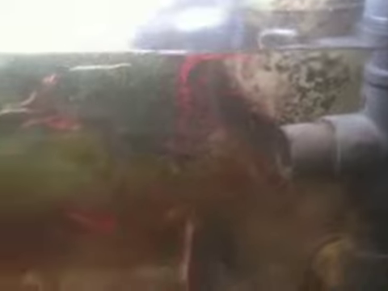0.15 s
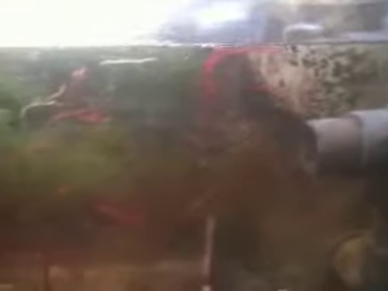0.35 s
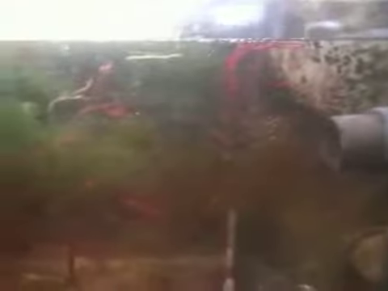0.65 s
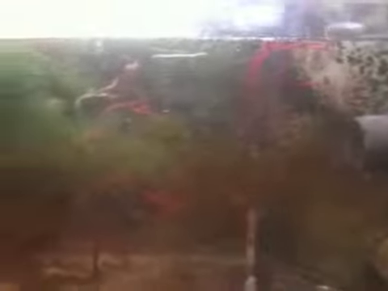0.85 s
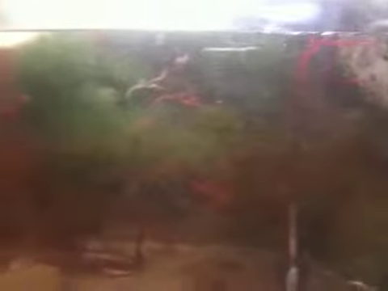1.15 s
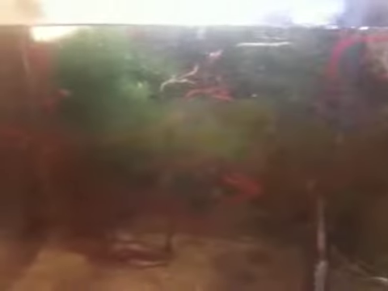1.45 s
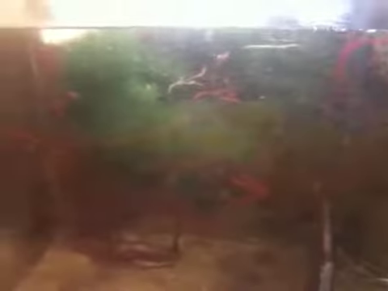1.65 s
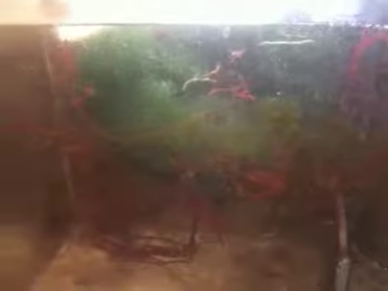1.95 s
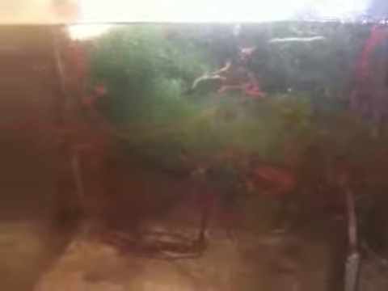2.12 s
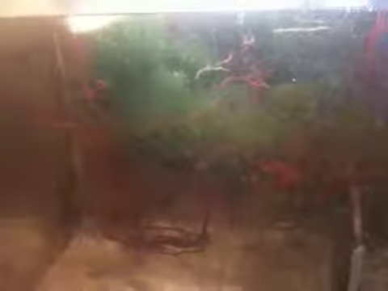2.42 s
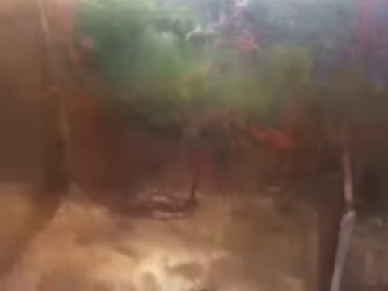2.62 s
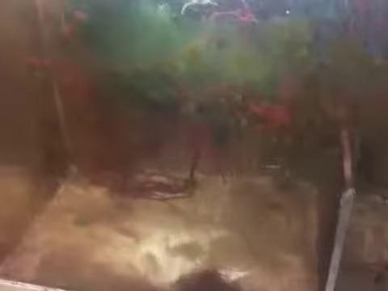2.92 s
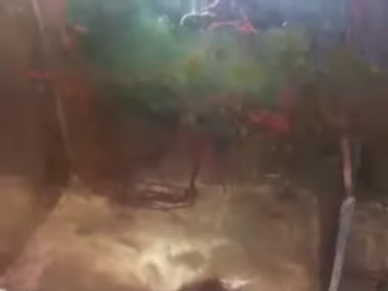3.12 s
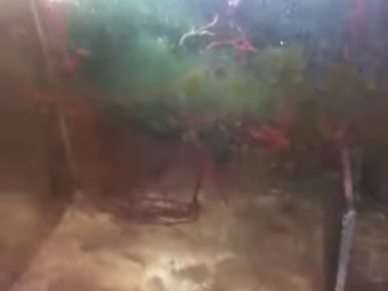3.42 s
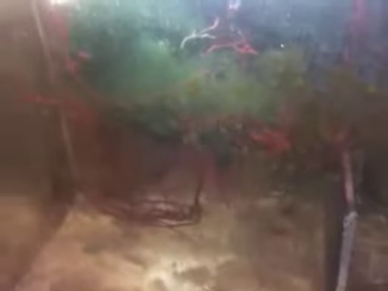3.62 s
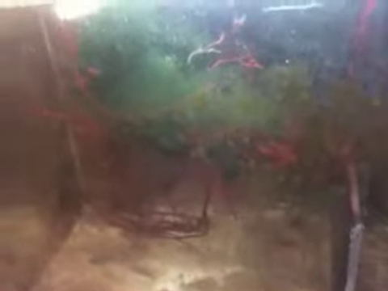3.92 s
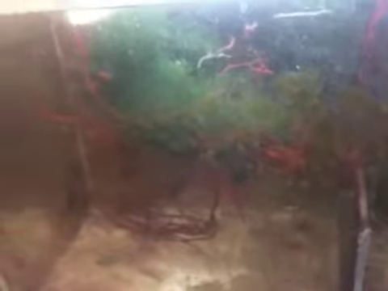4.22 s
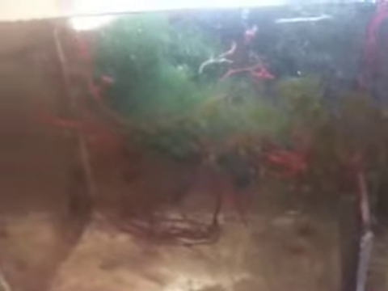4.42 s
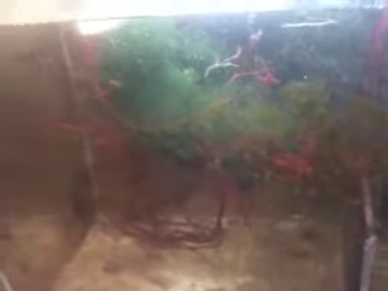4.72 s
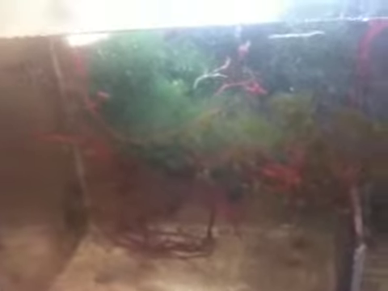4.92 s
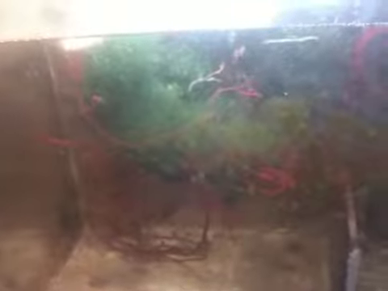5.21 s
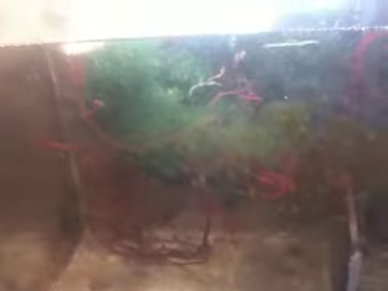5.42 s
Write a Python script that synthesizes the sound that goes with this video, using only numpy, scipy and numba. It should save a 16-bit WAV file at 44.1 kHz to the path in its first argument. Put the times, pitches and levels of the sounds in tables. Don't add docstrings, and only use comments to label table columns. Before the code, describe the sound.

Water trickles and bubbles through plastic pipes under an aquarium while a low mains hum drones continuously behind it.

```python
import sys
import numpy as np
from scipy import signal
from scipy.fft import rfft, irfft
from scipy.io import wavfile
from scipy.ndimage import uniform_filter1d
from numba import njit

SR = 44100
rng = np.random.default_rng(int(sys.argv[2]) if len(sys.argv) > 2 else 0)


def dump_mix(stems):
    frames = np.atleast_2d(stems).T
    limited = np.clip(frames, -1, 1)
    pcm = np.round(limited * 32767).astype(np.int16)
    wavfile.write(sys.argv[1], SR, pcm)


def elevation(decibels):
    levels = np.asarray(decibels, float)
    return 10 ** (levels / 20)


N = 244736

# mains_multiple, level_db
HUM_LINES = [(2, -52), (3, -39.5), (4, -65.5), (5, -60), (6, -70), (8, -59), (9, -72), (10, -73),
             (11, -85.5), (12, -72), (15, -71.5), (17, -76.5), (18, -70.5)]
# start_s, level_db
MOTOR_LOAD = [
    (0.0, -39),
    (0.06, -40.5),
    (0.71, -41),
    (0.8, -40.5),
    (2.98, -40),
    (5.5, -40.5),
    (5.55, -41.5),
]
# frequency_hz, level_db (per Hz)
RUMBLE_SHAPE = [(25, -34.5), (70, -32.5), (100, -19), (135, -4.5), (205, -1), (225, -14.5), (260, -8),
                (352, -15), (450, -8), (700, -13), (900, -27), (1300, -38)]
# frequency_hz, width_hz, lift_db
CABINET_MODES = [(185, 13, 4), (279, 23, 6), (306.3, 19, 6), (327, 15, 9), (271.4, 16.4, 3), (415, 24, 5),
                 (520, 20, -0.5), (592.6, 19, 4.5)]
# start_s, swell_db (negative chokes)
COLUMN_SLOSHES = [(.15, 8.5), (.6, 5), (.73, 5.5), (.82, 1), (.94, 2), (1.03, -4), (1.1, 6), (1.58, 4),
                  (1.68, -7), (1.82, -4), (1.96, 0), (2.06, 4), (2.18, -18), (2.3, 1), (2.4, 13.5),
                  (2.64, 3), (3.37, 5), (3.62, 0), (3.76, -12), (3.82, 8.5), (4.02, 5.5), (4.14, -8),
                  (4.65, 3), (4.73, -4), (4.9, 2), (4.95, -6), (5.19, 8), (5.3, -10)]
# start_s, place (0 outlet - 1 middle)
MIC_PLACE = [
    (0, 0.16),
    (.9, 0.41),
    (1.7, 0.96),
    (5.55, 0.96),
]
# frequency_hz, width_hz, outlet_lift_db, middle_lift_db
PIPE_MODES = [(1017, 147, 5, 15), (1178, 27, 1, 6), (1353, 120, 3, 6), (1505, 51, 3, 8.5),
              (1558, 37, -11, 14.5), (1635, 33, 13, 8), (1927, 92, -3.5, 6.5), (2225, 43, 4, 12.5),
              (2387, 34, 1, 11.5), (2590, 78, 6, 4.5), (2760, 42, 3.5, 5), (2783, 220, 2, 5),
              (3030, 29, 7, 10), (3260, 25, 9.5, 12.5), (3790, 88, -12, 12.5), (4360, 56, 8.5, 10),
              (4780, 28, 4, 16), (5040, 130, 5, 6), (5480, 36, 14, 12), (6020, 85, 10, 6), (6600, 73, 5, 6),
              (7100, 550, 6.5, 4)]
# frequency_hz, level_db (per Hz)
WATER_SHAPE = [(400, -27.5), (700, -12.5), (850, -13.5), (1240, -11), (1440, -13), (1760, -13.5),
               (2100, -15.5), (3500, -19), (5500, -21), (7200, -17), (8600, -21.5), (10000, -21.5),
               (11000, -50), (15700, -46)]
# start_s, stream_level_db, spray_lift_db
WATER_FLOW = [
    (0, -53.5, -13.5),
    (.8, -54.5, -9),
    (1.6, -57.5, -3),
    (2.4, -57.5, -1.5),
    (3.2, -58.5, -5.5),
    (4, -57.5, -2.5),
    (4.8, -57.5, -5),
    (5.55, -57.5, -3.5),
]
# start_s, level_db, pitch_hz, spread_octaves
WIDE_GURGLES = [(0.209, -51, 1620, 0.37), (0.637, -50, 1340, 0.72), (0.667, -47.5, 1600, 0.063),
                (0.831, -47.5, 1585, .19), (1.041, -46.5, 1450, 0.41), (1.139, -49.5, 1400, .21),
                (1.176, -50, 1750, 0.42), (1.542, -49, 1350, 0.84), (1.684, -46, 1530, 0.47),
                (2.462, -53, 1460, 0.36), (2.524, -55, 1440, 0.34), (2.678, -48, 1300, 0.56),
                (2.822, -52.5, 1590, 0.32), (2.896, -52, 1550, 0.23), (3.131, -49, 1543, 0.078),
                (3.184, -51.5, 1490, 0.19), (3.743, -51, 1530, 0.2), (3.777, -51, 1604, 0.11),
                (4.395, -60, 1570, 0.22), (4.705, -53.5, 1710, 0.71), (5.206, -48, 1900, 0.77)]
# start_s, level_db, pitch_hz
WIDE_BLIPS = [(0.5337, -41.5, 1510), (1.4301, -49, 1570), (1.6287, -54, 1560), (2.0273, -53, 1480),
              (2.277, -52, 1520), (2.4049, -52, 1510), (2.4892, -47, 1510), (2.9282, -52, 1360),
              (2.9946, -51, 1580), (3.2201, -51, 1550), (3.2615, -58, 1430), (3.3544, -52, 1500),
              (3.6491, -51, 1530), (3.686, -50, 1320), (3.8207, -51, 1570), (3.8506, -49, 1490),
              (3.8926, -51, 1530), (4.0193, -50, 1520), (4.1664, -48, 1520), (4.3136, -56, 1570),
              (4.362, -52, 1570), (4.4583, -52, 1420), (4.589, -52, 1400), (4.9576, -51, 1490),
              (5.0968, -55, 1480), (5.1317, -54, 1500), (5.2395, -50, 1560), (5.3612, -52, 1570),
              (5.453, -53, 1510), (5.5293, -56, 1600)]
# start_s, level_db, pitch_hz
NARROW_TRICKLES = [(0.397, -55.5, 2880), (0.535, -55.5, 2640), (0.824, -54, 3130), (1.051, -55.5, 3320),
                   (1.22, -57.5, 2900), (1.292, -60, 3100), (2.128, -59, 2860), (2.167, -57, 3200),
                   (2.354, -59, 2760), (2.705, -63, 2440), (3.437, -58.5, 2550), (3.548, -58, 2260),
                   (4.51, -61, 2920), (4.92, -59, 3200), (4.966, -56, 2200), (5.048, -56, 3000),
                   (5.39, -55, 2900)]
# start_s, level_db, pitch_hz
NARROW_BEADS = [(0.3451, -55, 2540), (0.442, -58, 2790), (0.4958, -51, 2520), (0.5696, -54, 2600),
                (0.6458, -55, 2660), (1.1378, -54, 2700), (1.3518, -54, 2680), (1.4064, -55, 2800),
                (1.516, -51, 2720), (1.5816, -50, 2760), (1.6856, -62, 2600), (1.7173, -53.5, 2670),
                (1.8806, -61, 2760), (2.0842, -53.5, 2760), (2.582, -57, 2780), (2.6397, -55, 2760),
                (2.967, -59, 2460), (3.2645, -56, 3270), (3.4057, -61, 2400), (3.6431, -54, 2690),
                (3.9, -58, 2700), (4.159, -56, 2900), (4.3161, -60, 2730), (4.7057, -58, 2360),
                (5.2031, -55, 2480), (5.244, -54, 2520)]
# start_s, level_db, pitch_hz
AIR_GLUGS = [(0.501, -47, 1070), (0.545, -42, 1160), (0.635, -45, 1090), (0.69, -50, 1020),
             (0.817, -48, 1050), (1.158, -54, 977), (1.189, -50, 1030), (1.271, -53, 1070),
             (1.68, -45, 1180), (1.756, -48, 910), (1.846, -55, 970), (2.025, -49, 1050), (2.155, -54, 972),
             (2.206, -55, 1070), (2.314, -53, 1090), (2.432, -51, 991), (2.684, -49, 1070),
             (2.723, -45, 1030), (2.798, -52, 1050), (2.857, -49, 1030), (2.901, -46.5, 1060),
             (3.033, -53, 1060), (3.228, -50, 960), (3.306, -49, 1180), (3.421, -53, 1090),
             (3.672, -49, 1020), (3.712, -52, 1060), (3.778, -48, 1040), (3.985, -60, 1030),
             (4.081, -51, 1050), (4.189, -51, 1010), (4.389, -50, 1020), (4.447, -47.5, 1010),
             (4.652, -54, 1080), (4.746, -51, 1030), (5.006, -49, 966), (5.053, -53, 1060),
             (5.139, -54, 1040), (5.452, -47, 1070), (5.484, -54, 1000)]
# start_s, level_db, pitch_hz
RIM_PLINKS = [(0.1251, -53.5, 4250), (0.2942, -49, 4270), (0.401, -52.5, 5050), (0.5745, -47, 5100),
              (0.824, -59, 5640), (1.0793, -55, 4360), (1.2745, -63, 3800), (1.322, -50, 4270),
              (1.4475, -51, 6110), (1.5768, -55, 4870), (1.6516, -54, 4830), (1.7345, -60, 5000),
              (2.0465, -53.5, 4890), (2.2174, -56, 4560), (2.6, -53, 3870), (2.7072, -62, 3780),
              (3.105, -52, 4830), (3.1657, -56, 6160), (3.2251, -58, 5040), (3.4216, -54, 6090),
              (3.678, -58, 3790), (3.8217, -57, 4870), (3.8985, -51, 6030), (3.9589, -58, 3790),
              (3.9977, -54, 4250), (4.2757, -58, 5900), (4.3625, -56, 3600), (4.4735, -52, 3990),
              (4.5385, -53, 4860), (4.6054, -54, 3840), (4.7167, -57, 4400), (4.8319, -57, 6140),
              (4.8853, -49.5, 5130), (4.9616, -56, 3690), (5.0384, -59, 3980), (5.1302, -61, 3790),
              (5.238, -56.5, 6130), (5.3014, -60, 4400)]
# start_s, level_db, pitch_hz, spread_octaves
SUMP_SPLASHES = [(0.245, -64, 8800, .3), (0.576, -52.5, 7800, 1.05), (0.802, -66, 7500, .27),
                 (0.827, -65, 9340, 1.18), (0.874, -62.5, 6600, .71), (1.08, -58, 9900, 0.74),
                 (1.156, -62.5, 8940, 1), (1.191, -64, 7520, .42), (1.228, -63, 9200, .22),
                 (1.334, -61, 9800, 0.7), (1.45, -58, 7400, 0.48), (1.577, -56.5, 7100, 1.3),
                 (1.731, -61, 10630, 0.96), (2.062, -58, 7900, 0.72), (2.345, -57.5, 10500, 1.4),
                 (2.676, -62, 9500, .3), (2.895, -61, 7200, .28), (3.023, -61.5, 11100, 0.98),
                 (3.169, -61, 9700, 0.48), (3.424, -60, 6700, 0.57), (3.831, -62, 11600, 0.7),
                 (3.9, -57, 7160, .91), (4.02, -64, 11100, .73), (4.112, -62, 7200, 0.42),
                 (4.218, -59, 11000, 1.1), (4.424, -60.5, 7000, 0.61), (4.539, -58.5, 7520, 1.1),
                 (4.889, -59.5, 11100, 0.78), (5.131, -57, 9350, .3), (5.314, -67, 11100, .83)]
# start_s, level_db, pitch_hz
FINE_SPITS = [(0.1156, -61, 14200), (0.4025, -62, 14100), (0.5736, -47, 12500), (0.822, -61, 11000),
              (1.0789, -55, 14200), (1.2531, -58, 12000), (1.3319, -59, 15400), (1.4506, -57, 13700),
              (1.5294, -55, 14400), (1.5743, -58, 11000), (1.73, -59, 12800), (1.7699, -56, 13300),
              (2.3416, -53, 12900), (2.4498, -61, 12000), (2.584, -55, 14700), (2.7043, -62, 15400),
              (2.7916, -60, 14300), (2.8634, -55, 14300), (2.9093, -57, 13600), (3.0225, -59, 13700),
              (3.1622, -61, 12100), (3.5483, -61, 13400), (3.8172, -57, 12800), (3.902, -56, 11100),
              (4.0183, -58, 14200), (4.2043, -57, 14100), (4.365, -60, 14100), (4.5067, -55, 11000),
              (4.54, -58, 11100), (4.5815, -59, 12700), (4.6174, -50, 15400), (4.8404, -64, 13600),
              (4.8898, -58, 12900), (5.1302, -59, 11300), (5.3622, -60, 13200), (5.452, -52, 15200)]


def level(x, db):
    return x * elevation(db) / np.sqrt(np.mean(x ** 2))


def curve(table):
    s, *columns = np.transpose(table)
    return [np.interp(np.arange(N) / SR, s, c) for c in columns]


def walk(rate_hz):
    k = int(SR / rate_hz)
    held = np.repeat(rng.standard_normal(N // k + 1), k)
    return 0.89 * uniform_filter1d(uniform_filter1d(held, k), k)[:N]


def colour(x, shape, modes, size=16384):
    hz = np.arange(size // 2 + 1) * SR / size + 1
    shape_hz, shape_db = np.transpose(shape)
    db = np.interp(np.log(hz), np.log(shape_hz), shape_db)
    db = db + sum(lift / (1 + (2 * (hz - f) / w) ** 2) for f, w, lift in modes)
    cep = irfft(np.log(elevation(db)))
    cep[1:size // 2] *= 2
    cep[size // 2 + 1:] = 0
    return signal.fftconvolve(x, irfft(np.exp(rfft(cep))))[:N]


@njit
def bubbles(start, hz, cycles, size, glide, length):
    out = np.zeros(length)
    for k in range(len(start)):
        n = int(cycles[k] * SR / hz[k]) + 2
        fade, up = np.exp(-np.log(1000) / n), (1 + glide) ** (1 / n)
        a, w, phase, shut = size[k], 2 * np.pi * hz[k] / SR, 0., 1.
        for i in range(start[k], min(start[k] + n, length)):
            out[i] += a * (1 - shut) * np.sin(phase)
            phase += w
            w = min(w * up, 3.)
            a *= fade
            shut *= fade ** 4
    return out


def slosh():
    t, bump_s = np.arange(N) / SR, 0.016
    return sum(db * np.exp(-.5 * ((t - s) / bump_s) ** 2) for s, db in COLUMN_SLOSHES)


def pump():
    mains_hz, jolt_s = 60.024, .0016
    load_db, = curve(MOTOR_LOAD)
    turn = 2 * np.pi * mains_hz * (np.arange(N) / SR - jolt_s)
    lines = 0
    for k, db in HUM_LINES:
        phase = (k > 6) * rng.uniform(0, 2 * np.pi)
        waver_db = (.4 + .6 * (k > 9)) * walk(7.5)
        lines = lines + elevation(db + waver_db) * np.sqrt(2) * np.cos(k * turn + phase)
    rough = rng.standard_normal(N) * elevation(.5 * walk(20))
    rumble = level(colour(rough, RUMBLE_SHAPE, CABINET_MODES), -52)
    near_column = signal.butter(2, (250, 340), "band", fs=SR, output="sos")
    band = signal.sosfiltfilt(near_column, lines + rumble)
    return lines * elevation(load_db - load_db.mean()) + rumble + band * (elevation(slosh()) - 1)


def pipes(x, shape, share):
    place, = curve(MIC_PLACE)
    f, w, outlet_db, middle_db = np.transpose(PIPE_MODES)
    cap_db = np.where(f > 2000, 8, 12)
    w = np.maximum(w, f / 100)
    outlet = colour(x, shape, zip(f, w, share * np.minimum(outlet_db, cap_db)))
    middle = colour(x, shape, zip(f, w, share * np.minimum(middle_db, cap_db)))
    return outlet + np.clip(place, 0, 1) * (middle - outlet)


def sump(x):
    trips_ms, back = np.array([1.3, 2.9, 4.7, 7.9]), 0.5
    turn = -2j * np.pi * np.arange(N // 2 + 1) * SR / N
    trips = np.exp(turn * trips_ms[:, None] / 1000)
    return irfft(rfft(x, N) * np.prod((trips - back) / (1 - back * trips), axis=0), N)[:N]


def mist():
    t, fade_s = np.arange(N) / SR, 0.1
    lull = sum((t > s) * np.exp(-np.abs(t - s) / fade_s) for s, *_ in SUMP_SPLASHES)
    return -2 * np.minimum(lull, 1) + 4 * walk(19.0)


def swarm(lo_hz, cycles, scatter_db, per_hz):
    when, pitch, loud = rng.random((int(per_hz * lo_hz), 3)).T
    hz = lo_hz * (1 + (np.sqrt(2) - 1) * pitch)
    extra_db = np.minimum(-scatter_db * np.log(1 - loud), 9)
    size = np.sqrt(hz) * elevation(extra_db)
    x = bubbles((when * N).astype(np.int64), hz, cycles + 0 * hz, size, 0.087, N)
    return level(x, 10 * np.log10(lo_hz))


def stream():
    flow_db, spray_db = curve(WATER_FLOW)
    mist_db = mist()
    spit, mix = walk(23.88), 0
    for hz in 350 * 2 ** np.arange(0, 5.6, .5):
        fine = np.clip(np.log2(hz / 2500) / 2, 0, 1)
        surge_db = .9 * spit + 1.16 * walk(25.97) + 0.36 * walk(7.9)
        surge_db = surge_db + fine * (1.9 * spit + spray_db) + fine ** 3 * mist_db
        mix = mix + swarm(hz, 21.2 + 45 * fine, 2.0 + 3.4 * fine, 3. - 1.8 * fine) * elevation(surge_db)
    return level(pipes(mix, WATER_SHAPE, 1), 0) * elevation(flow_db)


def rows(table, *shared):
    return np.c_[table, np.tile(shared, (len(table), 1))]


def bursts(table, ring, trim_db, count):
    s, db, hz, spread, ms = (c[:, None] for c in np.transpose(table))
    late, off = np.moveaxis(rng.random((len(table), count, 2)), -1, 0)
    swell_s = 7 / hz
    start = (SR * (s - swell_s + 1.3 * ms / 1000 * late ** 2.1)).astype(np.int64)
    pitch = np.minimum(hz * 2 ** (spread * (off - .5)), .4 * SR)
    cycles = ring / spread + 0 * off
    ring_s = cycles / pitch / (4 * np.log(1000))
    size = elevation(db + trim_db) * np.sqrt((ms / 1000 + 0.0036) / (count * ring_s))
    return bubbles(start.ravel(), pitch.ravel(), cycles.ravel(), size.ravel(), 0.028, N)


def spatter(level_db, scatter_db, low_hz, octaves, wide_oct, count):
    when, loud, pitch, spread, span = rng.random((count, 5)).T
    db = level_db + np.minimum(-scatter_db * np.log(1 - loud), 6)
    return np.c_[when * N / SR, db, low_hz * 2 ** (octaves * pitch), .25 + wide_oct * spread, 5 + 14 * span]


def drain_bubbles():
    wide = bursts(rows(WIDE_GURGLES, 9), 9.5, -8.0, count=14)
    wide = wide + bursts(rows(WIDE_BLIPS, 0.13, 12), 4.4, -14.0, count=8)
    narrow = bursts(rows(NARROW_TRICKLES, 0.35, 11), 6.3, -3.0, count=12)
    narrow = narrow + bursts(rows(NARROW_BEADS, 0.24, 16), 7.5, -12.0, count=12)
    standpipe = bursts(rows(AIR_GLUGS, .2, 16), 3.6, -16.5, count=8)
    return wide + narrow + standpipe


def droplets():
    rim = bursts(rows(RIM_PLINKS, 0.31, 12), 5.9, -9.5, count=24)
    splashes = bursts(rows(SUMP_SPLASHES, 11), 13.4, 0.25, count=110)
    finest = bursts(rows(FINE_SPITS, 0.64, 16), 9.3, -10.5, count=60)
    high = bursts(spatter(-71, 2.7, 6050, 1.33, 0.85, count=120), 3.1, 0, count=30)
    low = bursts(spatter(-70, 1.4, 2300, 1.37, 0.19, count=110), 6.9, 0, count=10)
    return rim + splashes + finest + high + low


def scene():
    drops = pipes(drain_bubbles() + droplets(), [(60, -30), (510, 0), (16000, 0)], 0.96)
    water = sump(stream() + elevation(-12) * drops)
    return (pump() + drops + water)[None]


def low_pass(x):
    return signal.sosfilt(signal.butter(12, 16600, fs=SR, output="sos"), x)


def record(dry):
    top_cut = signal.ellip(12, .3, 70, 15750, fs=SR, output="sos")
    x = signal.sosfilt(top_cut, dry)
    return low_pass(x)


dry = scene()
out = record(dry)
dump_mix(out)
```